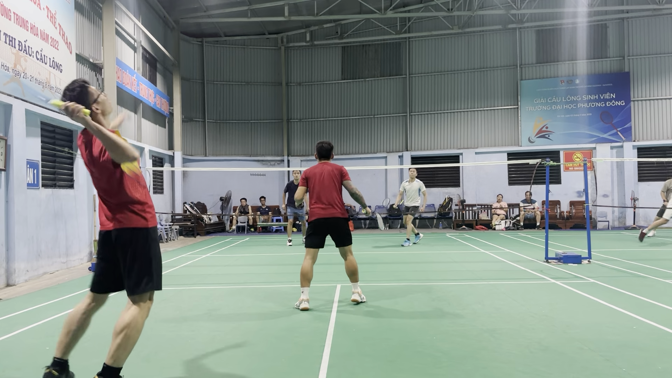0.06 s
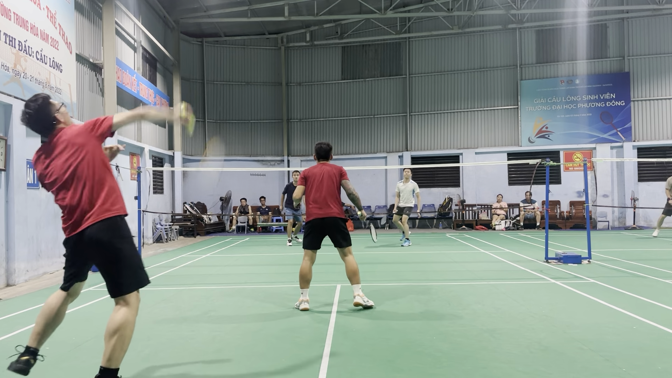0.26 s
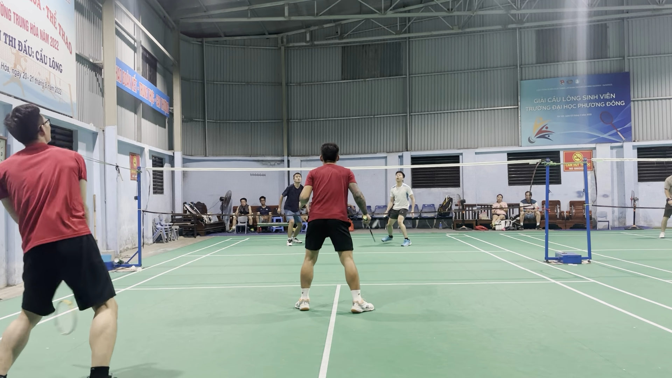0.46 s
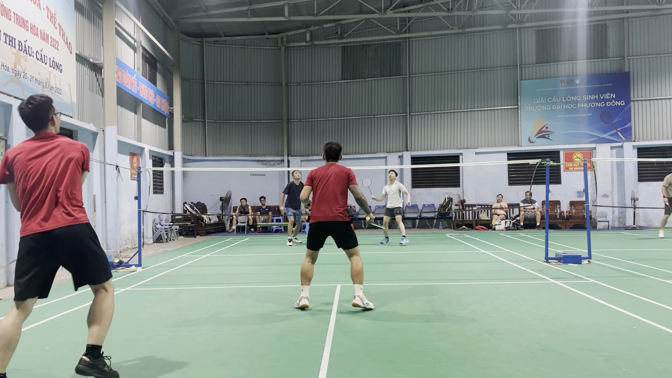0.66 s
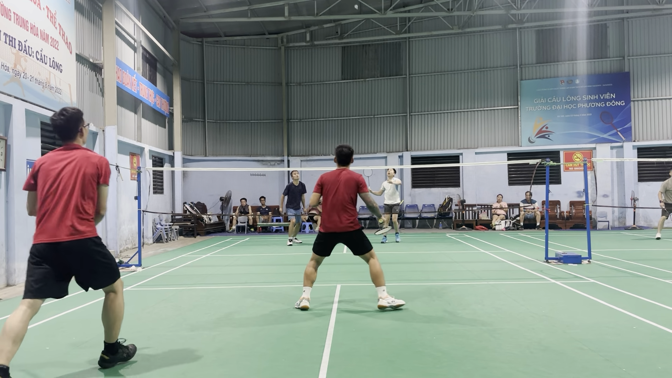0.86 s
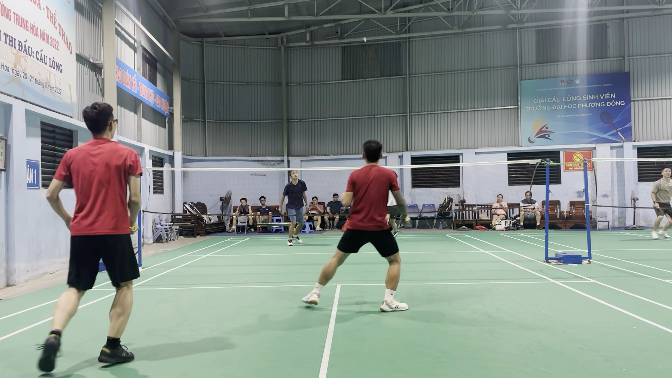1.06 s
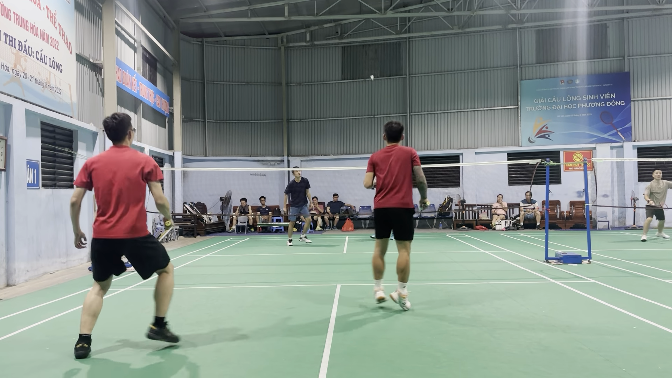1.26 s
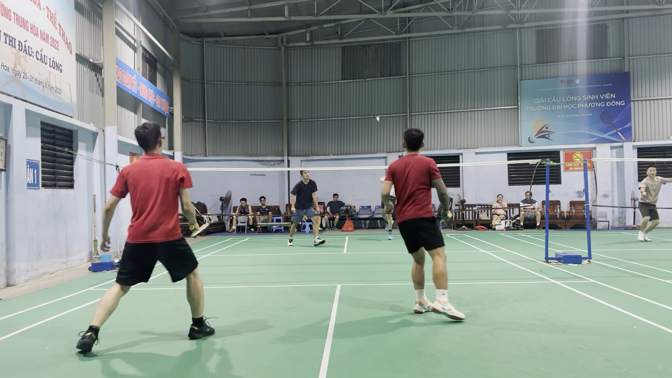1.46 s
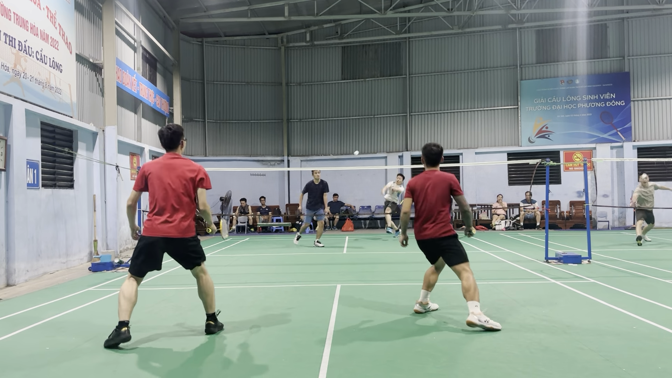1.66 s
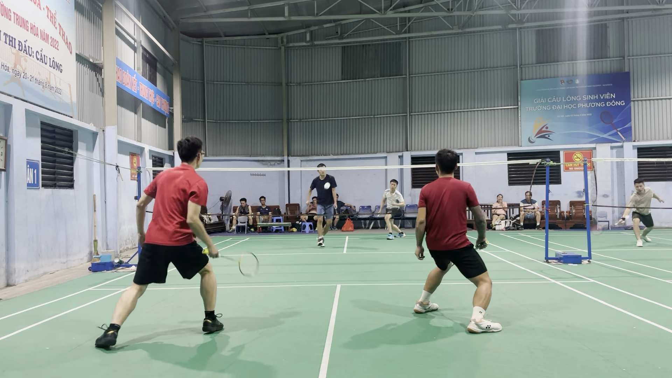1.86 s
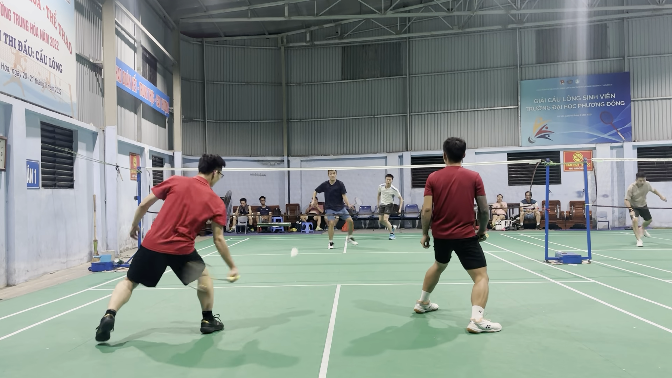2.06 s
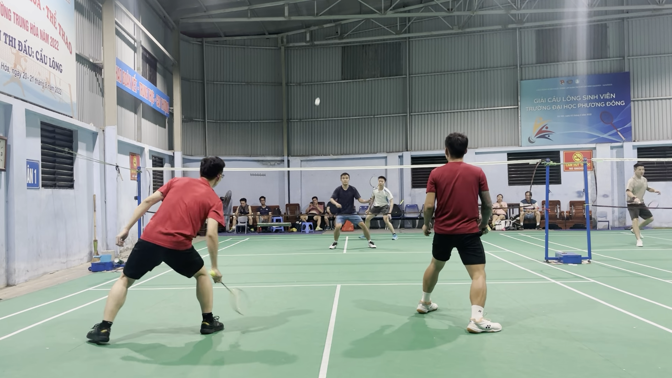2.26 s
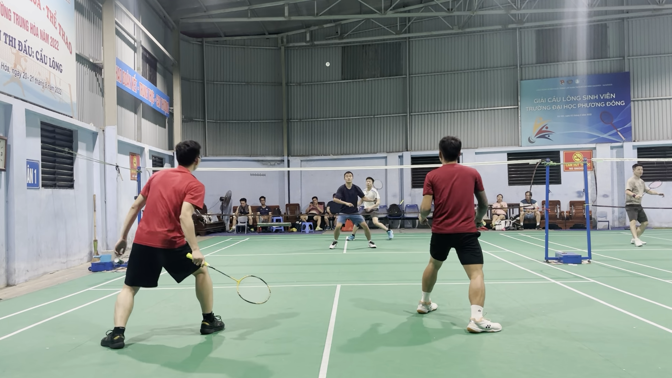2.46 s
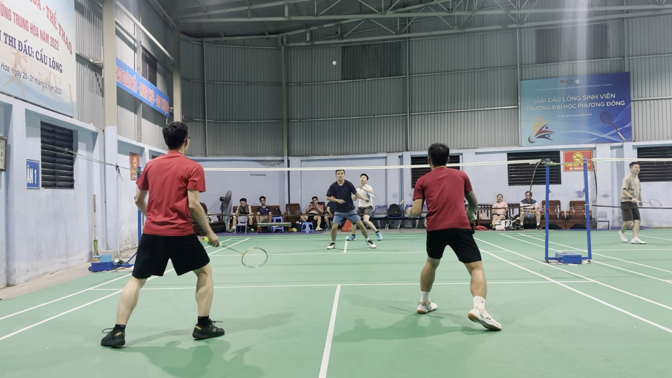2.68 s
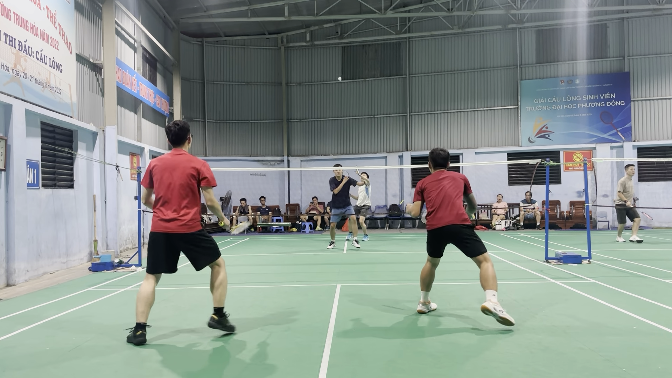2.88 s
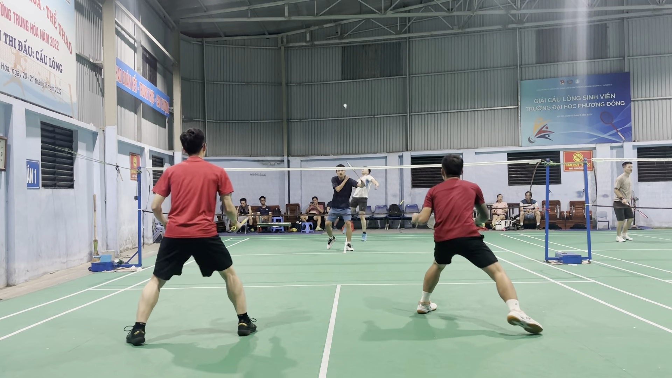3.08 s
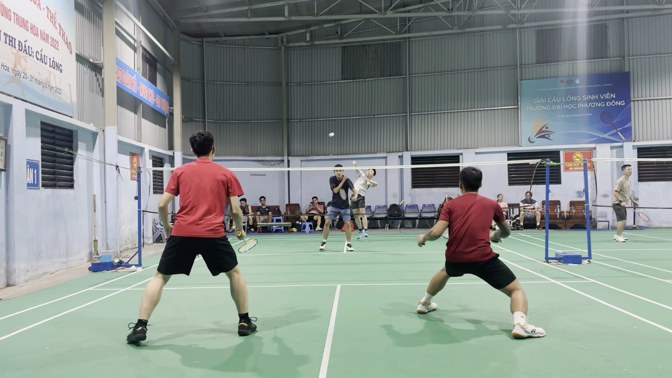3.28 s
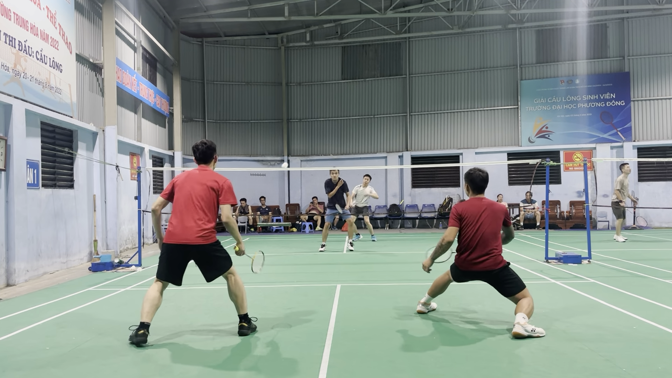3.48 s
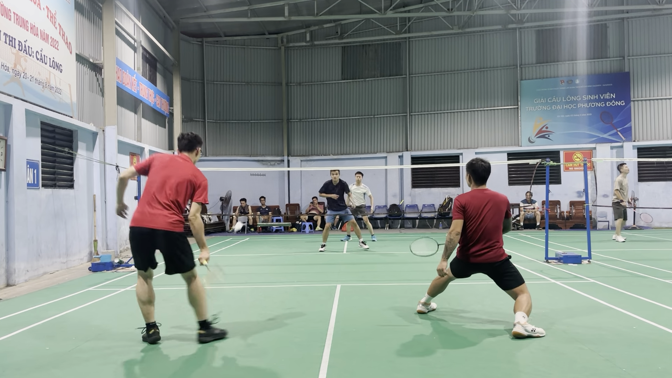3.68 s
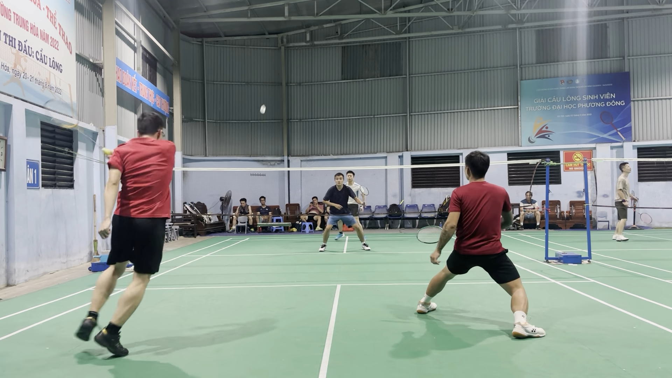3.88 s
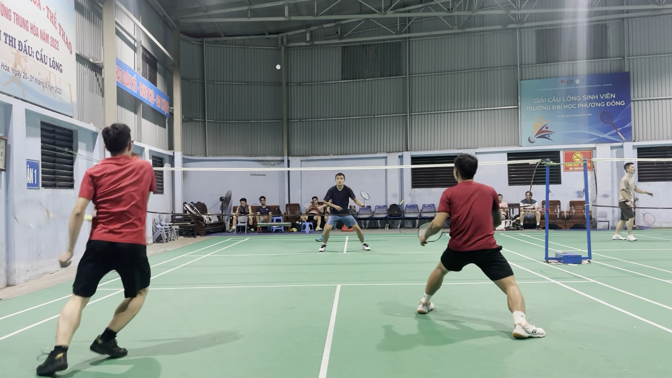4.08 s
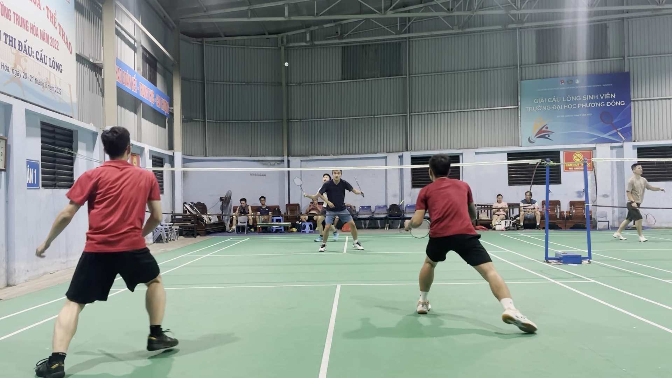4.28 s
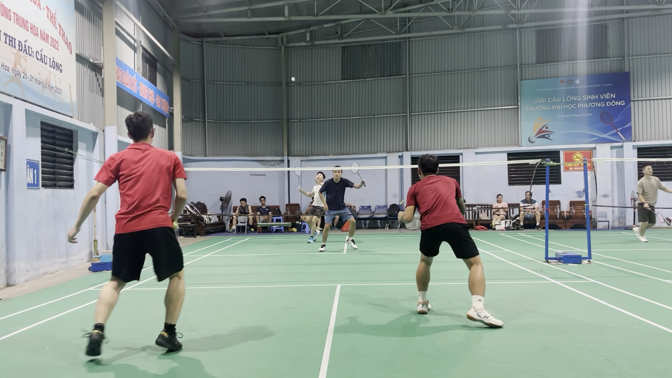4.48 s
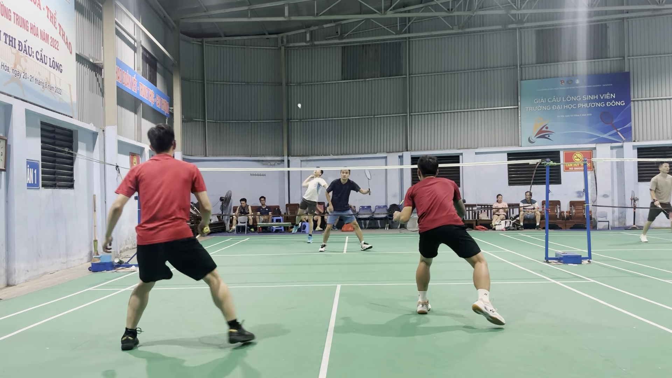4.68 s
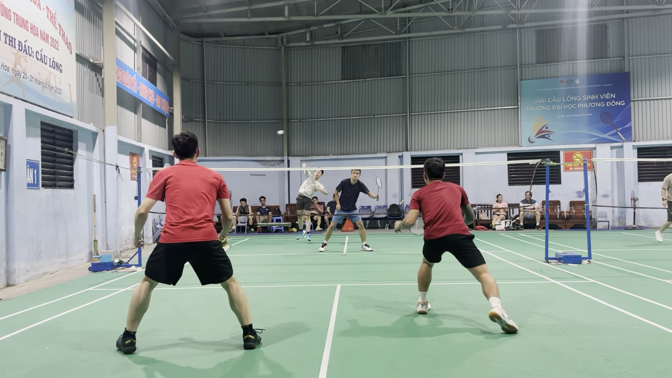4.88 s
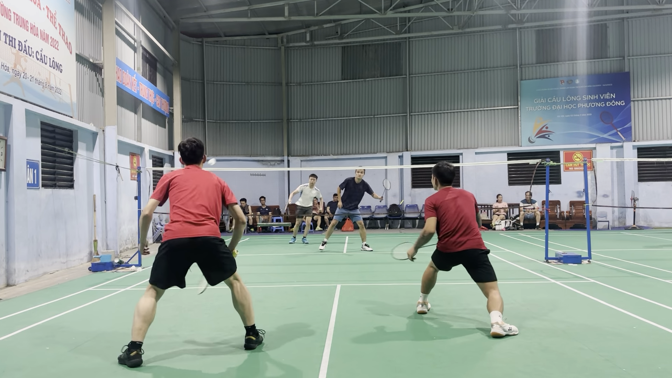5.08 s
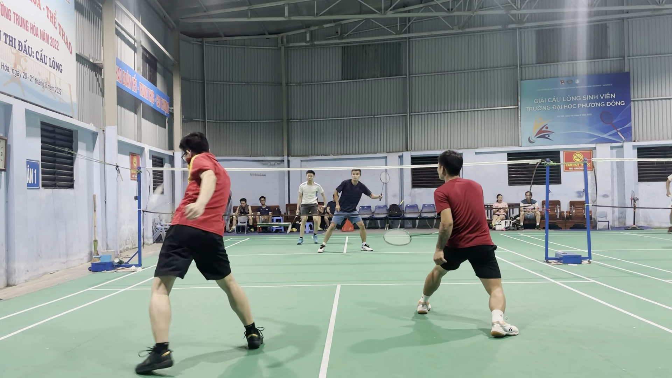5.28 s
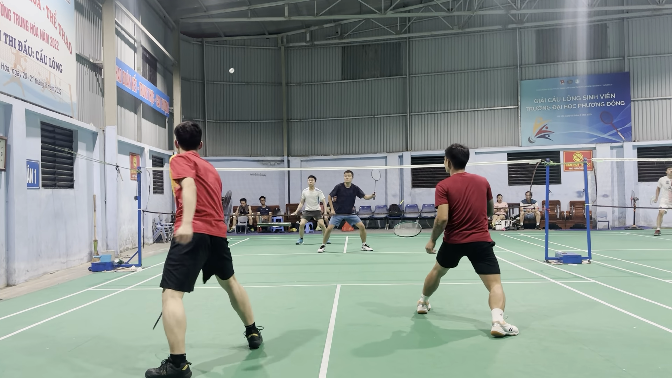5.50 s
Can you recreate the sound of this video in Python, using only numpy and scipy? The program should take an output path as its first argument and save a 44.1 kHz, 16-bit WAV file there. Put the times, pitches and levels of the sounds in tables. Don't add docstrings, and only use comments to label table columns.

```python
import sys
import numpy as np
from scipy import signal
from scipy.fft import rfft, irfft, next_fast_len
from scipy.io import wavfile
from scipy.ndimage import uniform_filter1d

SR = 44100
rng = np.random.default_rng(int(sys.argv[2]) if len(sys.argv) > 2 else 0)


def amplitude_ratio(level_db):
    exponent = np.asarray(level_db, float) / 20
    return 10 ** exponent


def wav_out(sig):
    wavfile.write(sys.argv[1], SR, np.round(np.clip(np.atleast_2d(sig).T, -1, 1) * 32767).astype(np.int16))


N = 244314
T = np.arange(N) / SR
SIZE = next_fast_len(N + 4096)
F = np.arange(SIZE // 2 + 1) * SR / SIZE + 1e-9


def unit(x):
    return x / np.sqrt(np.mean(x ** 2))


def along(table, hz, col=1):
    rows = np.array(table, float)
    return np.interp(np.log(hz), np.log(rows[:, 0]), rows[:, col])


def band(x, hz, width):
    return signal.lfilter(*signal.iirpeak(min(hz, .45 * SR), hz / width, SR), x)


def add(out, s, x):
    i = int(s * SR)
    out[..., i:i + x.shape[-1]] += x[..., :N - i]


def walk(rate):
    k = int(SR / rate)
    steps = np.repeat(rng.standard_normal(N // k + 1), k)
    return 0.34 * uniform_filter1d(uniform_filter1d(steps, k), k)[:N]


def split(colour, centres):
    white = rfft(rng.standard_normal((2, SIZE), dtype=np.float32))
    noise = white * amplitude_ratio(along(colour, F)).astype(np.float32)
    noise = noise / np.sqrt(np.mean(irfft(noise[0], SIZE) ** 2))
    place = np.interp(np.log(F), np.log(centres), np.arange(len(centres))).astype(np.float32)
    bands = []
    for k in range(len(centres)):
        share = np.sqrt(np.clip(1 - abs(place - k), 0, 1))
        bands.append(irfft(noise * share, SIZE)[:, :N])
    return bands


def fade(power, t60, rise_s):
    keep, grow = 10 ** (-6 / (t60 * SR)), np.exp(-1 / (rise_s * SR))
    return signal.lfilter([1 - grow], np.convolve([1, -keep], [1, -grow]), power)


def charge(feeds, hz):
    power = np.zeros(N)
    for s, length, *db in feeds:
        count = int(length * SR) + 1
        level = np.interp(np.log(hz), np.log([1000, 3500, 12000]), db)
        add(power, s, np.full(count, amplitude_ratio(2 * level) / count))
    return power


# (frequency [Hz], level [dB per Hz])
FAN_COLOUR = [(100, -20.5), (300, -0.5), (600, -5.5), (1200, -11), (2500, -20.5), (4500, -26), (6500, -29),
              (9000, -30), (13000, -70), (15000, -25), (16500, -70)]
# (frequency [Hz], level [dB per Hz])
STREET_COLOUR = [(20, -40), (32, -29), (45, -9), (65, -2), (100, 4), (150, 2.5), (250, -8), (400, -16),
                 (700, -21), (1200, -46)]
# (time [s], level [dB])
STREET_COURSE = [(0, -21), (.9, -24.5), (1.5, -24), (2.3, -24.5), (3, -29.5), (5.54, -28.5)]


def fans_and_street():
    out, swell = 0, walk(0.7)
    for noise in split(FAN_COLOUR, 200 * 2. ** np.arange(7)):
        out = out + noise * amplitude_ratio(-41.5 + 0.81 * swell + 3.1 * walk(6.83))
    street_db = np.interp(T, *np.transpose(STREET_COURSE)) - 7.5
    for noise in split(STREET_COLOUR, 40 * 2 ** np.arange(0, 4, .7)):
        out = out + noise * amplitude_ratio(street_db + 2.1 * walk(2.83))
    return out


def motorbike(rate, course, door, exhaust, scatter_db, jitter_s, smear_s):
    s, level = np.transpose(course)
    door_s, door_db, loss_db_per_s = door
    tick_db = door_db - loss_db_per_s * abs(T - door_s)
    arrive = np.clip((T - s[0] + .001) / .1 + (s[0] < .1), 0, 1)
    on = arrive * np.clip((s[-1] - T) / .1, 0, 1)
    cycles = np.cumsum(np.interp(T, *np.transpose(rate))) / SR
    fire = np.flatnonzero(np.diff(np.floor(cycles)))
    chance = rng.standard_normal((200, 3))[:len(fire)].T
    pulses, ticks = np.zeros((2, N))
    late = (jitter_s * SR * chance[0]).astype(int)
    pulses[np.clip(fire + late, 0, N - 1)] = amplitude_ratio(scatter_db * chance[1])
    ticks[fire] = amplitude_ratio(3.0 * chance[2])
    smear = rfft(rng.standard_normal(2048) * np.exp(-T[:2048] / smear_s), SIZE)
    boom = irfft(rfft(pulses, SIZE) * smear / abs(smear) * amplitude_ratio(along(exhaust, F)), SIZE)[:N]
    tick = band(band(ticks, 3800, 1100), 3800, 1100)
    return on * amplitude_ratio(np.interp(T, s, level)) * unit(boom), on * amplitude_ratio(tick_db) * unit(tick)


# (time [s], rate [Hz])
FAR_RATE = [(2.3, 23), (2.95, 24), (3.3, 23.9), (3.6, 23), (4.5, 22), (5, 22.9), (5.54, 22.9)]
# (time [s], level [dB])
FAR_COURSE = [
    (2.3, -31.5),
    (2.8, -37.5),
    (3.05, -31.5),
    (3.5, -35),
    (4, -33),
    (4.5, -47.5),
    (4.9, -36.5),
    (5.54, -39),
]
# (frequency [Hz], level [dB per Hz])
FAR_EXHAUST = [(30, -38), (48, 0.5), (70, -5.5), (95, -8), (120, -7), (143, -1), (190, -17.5), (250, -4.5),
               (330, -13.5), (500, -72)]


def far_motorbike():
    return motorbike(FAR_RATE, FAR_COURSE, (2.7, -68, 3), FAR_EXHAUST, 1.8, .0003, .018)


# (time [s], rate [Hz])
NEAR_RATE = [(0, 21.3), (.9, 21.75), (1.45, 20.55), (1.9, 20.55), (2.45, 20.2)]
# (time [s], level [dB])
NEAR_COURSE = [
    (0, -26),
    (.35, -29),
    (.5, -26),
    (1, -24),
    (1.15, -33),
    (1.5, -29.5),
    (1.951, -27.5),
    (2.15, -45),
    (2.45, -24),
]
# (frequency [Hz], level [dB per Hz])
NEAR_EXHAUST = [(25, -50), (42, -13), (65, -16), (85, -14), (105, 1.5), (128, -1), (152, 0), (185, -21),
                (240, -13), (330, -21), (500, -66.5)]


def near_motorbike():
    return motorbike(NEAR_RATE, NEAR_COURSE, (0.96, -52, 16), NEAR_EXHAUST, 1.6, .0003, .015)


# (frequency [Hz], level [dB per Hz])
HALL_COLOUR = [(120, -17), (250, -6), (500, -2.5), (900, -1), (1400, -2.5), (2200, -5.5), (3200, -11),
               (5000, -13), (7000, -19), (10000, -23), (13500, -28.5), (15500, -14), (16800, -60)]
# (frequency [Hz], T60 [s])
HALL_DECAY = [(200, 3), (1000, 3.15), (3000, 1.36), (6000, 1.85), (9000, 1.29), (15000, 0.87)]
# (frequency [Hz], T60 [s], level over the late sound [dB])
EARLY_DECAY = [(201, 0.42, 10), (2160, 0.12, 0), (12000, 0.3, 1)]
# (time [s], length [s], level [dB])
FAR_SLAPS = [
    (0.335, 0.01, -23),
    (0.441, 0.024, -26),
    (0.48, 0.086, -27.5),
    (4.918, .015, -19),
    (1.982, 0.0065, -33),
    (3.237, 0.017, -24),
    (3.323, 0.02, -25),
]
# level [dB] at (bass, middle, top)
HANGING_HIT = (-40.5, -41.5, -47)


def hall(feeds):
    centres = 180 * 2 ** np.arange(0, 7, .7)
    feeds = [(0.001, 0, *HANGING_HIT)] + feeds
    far = [(s, length, db, db - 9.5, db + 0.5) for s, length, db in FAR_SLAPS]
    out, lumps = 0, amplitude_ratio(1.1 * walk(46.15))
    for hz, noise in zip(centres, split(HALL_COLOUR, centres)):
        power = charge(feeds, hz)
        early_gain = lumps * amplitude_ratio(2 * along(EARLY_DECAY, hz, col=2))
        early = early_gain * fade(power, along(EARLY_DECAY, hz), 0.001)
        slaps = fade(charge(far, hz) + 1e-18, .15, .002)
        late = fade(power, along(HALL_DECAY, hz), 0.0098)
        out = out + noise * np.sqrt(early + slaps + late)
    return out


# (time [s], peak level [dB], length [s], hall share [dB])
SLIDES = [(0.908, -45.5, 0.0076, -14.5), (1.15, -50, 0.017, -15), (1.206, -39.5, 0.023, -23.5),
          (1.38, -42, 0.033, -21.5), (1.98, -46, 0.03, -11.5), (2.362, -51, 0.03, -55),
          (2.588, -52, 0.039, -11.5), (2.6694, -59.5, 0.03, -37), (2.835, -48, 0.028, -20),
          (3.003, -58, 0.026, -11), (3.136, -46, 0.042, -19), (3.639, -38.5, 0.12, -22.5),
          (3.706, -42, 0.079, -29), (4.071, -47, 0.018, -111), (4.293, -50, 0.026, -68),
          (4.627, -41, 0.02, -47), (4.827, -48, 0.074, -17), (5.243, -36, 0.021, -21.5)]


def scuffs():
    spread, feeds = np.zeros((2, N)), []
    t = T[:8192]
    treble = signal.butter(2, [4000, 15000], "bandpass", fs=SR, output="sos")
    for s, db, length, wet_db in SLIDES:
        chance = rng.standard_normal((2, 8192))
        grit = chance[0] * amplitude_ratio(5.0 * unit(uniform_filter1d(chance[1], size=60)))
        shape = np.minimum(t / 0.00088, 1) / (1 + (t / length) ** 4)
        hiss = signal.sosfilt(treble, grit)
        add(spread[0], s, amplitude_ratio(db - 6.0) * unit(hiss) * shape)
        wet = db + wet_db
        feeds.append((s, length, wet, wet + 16.5, wet + 18.0))
    return spread, feeds


# (time [s], length [s], start pitch [Hz], level [dB], hall share [dB])
SQUEALS = [(0.582, 0.069, 2930, -43.5, -1.5), (1.99, 0.079, 1200, -50, 8), (2.592, 0.057, 4500, -50.5, 0),
           (2.632, 0.019, 4560, -41, -19), (2.68, .06, 4510, -46, -9.5), (2.77, .055, 4520, -51, -4),
           (3.695, 0.016, 3220, -29.5, -18), (3.74, 0.029, 2620, -36.5, -22),
           (4.37, 0.23, 4650, -53.5, -10), (5.245, .012, 2940, -37, -21), (5.25, .012, 6470, -38, -22)]


def squeaks():
    direct, spread = np.zeros(N), np.zeros((2, N))
    t = T[:16384]
    for s, length, from_hz, db, wet_db in SQUEALS:
        to_hz = from_hz * (1 - 0.0073 - 0.035 * amplitude_ratio(2 * (db + 31)))
        chance = rng.standard_normal((4, 16384))
        gone = np.minimum(t / length, 1)
        waver = unit(uniform_filter1d(chance[:2], size=300))
        pitch = (from_hz + (to_hz - from_hz) * gone) * (1 + .008 * waver[0])
        turn = 2 * np.pi * np.cumsum(pitch) / SR
        shape = np.sin(np.pi * gone) ** .6 * amplitude_ratio(db + 2.5 * waver[1])
        add(direct, s, shape * (np.sin(turn) + amplitude_ratio(-9.5) * np.sin(2 * turn)))
        tail = np.sqrt(fade(shape ** 2 / (length * SR), 3.2, 0.007)) * np.cos(np.pi / 2 * t / t[-1])
        ring = unit(band(band(chance[2:], to_hz, 300), to_hz, 300))
        add(spread, s, amplitude_ratio(wet_db) * tail * ring)
    return direct, spread


def crack(thud_db, knock_db, feather_db, knock_hz, chance):
    t = np.arange(len(chance)) / SR
    rattle = chance * np.exp(-.5 * ((t - .0009) / 0.0007) ** 2)
    turns = 900 * (t + 0.00033 * (1 - np.exp(-t / 0.00028)))
    thud = np.sin(2 * np.pi * turns) * (t / .0008) ** 2 * np.exp(-t / 0.0005)
    tap = np.exp(-.5 * ((t - .001) / .00004) ** 2) + 0.049 * rattle
    knock = band(tap, knock_hz, 630) - amplitude_ratio(-6.5) * band(tap, 2.01 * knock_hz, 960)
    feathers = band(band(rattle, 8200, 15000), 8000, 16000)
    parts = (thud, 1.5), (knock, knock_db + 12.0), (feathers, feather_db + 9.5)
    return sum(amplitude_ratio(thud_db + db) * part / abs(part).max() for part, db in parts)


# (time [s], string thud peak [dB], cork knock re thud [dB], hall share [dB], knock pitch [Hz])
STROKES = [
    (0.238, -9.5, -8.5, -17.5, 1630),
    (1.618, -10.5, -8, -18, 2070),
    (2.146, -21, -7.5, -18.5, 2000),
    (3.171, -25.5, 1.5, -9.5, 2450),
    (3.28, -10.5, -9.5, -16.5, 2010),
    (3.7898, -27, 4.5, -16.5, 1790),
    (4.3415, -32, -6.5, -13, 3870),
    (4.8804, -6, -10, -20.5, 1900),
    (5.296, -22, -13.5, -15.5, 1840),
]
# (time [s], thud peak [dB], feather crack re thud [dB])
FIRST_RETURNS = [(0.2426, -14, -29), (0.2503, -12, -15), (1.6276, -17.5, -23), (1.637, -29, -13),
                 (1.983, -39, -6), (3.2875, -17, -3), (3.2995, -24, -14), (3.801, -35, 7),
                 (4.8843, -14.5, -33), (4.8866, -10.5, -3), (4.8905, -22, -20), (4.8995, -9.5, -20)]
# (frequency [Hz], width [Hz], level re thud [dB])
RACKET_MODES = [(910, 39, -42), (1010, 310, -16.5), (1124, 18, -11.5), (1900, 130, -13.5), (2420, 170, -39)]


def rackets():
    direct, spread, feeds, ring = np.zeros(N), np.zeros((2, N)), [], np.zeros(N)
    for s, db, knock, wet_db, hz in STROKES:
        feather = -6 + 7.5 * np.log2(hz / 1900) + 0.3 * (knock + 10)
        dry_blow = crack(db, knock, feather, hz, rng.standard_normal(2048))
        blow = dry_blow
        for mode_hz, width, mode_db in RACKET_MODES:
            mode = band(dry_blow, mode_hz, width)
            blow = blow + amplitude_ratio(db + mode_db) * mode / abs(mode).max()
        add(direct, s + .0001, blow)
        when, size = rng.random((2, 2, 24))
        walls = np.zeros((2, 8192))
        lag = (.013 + .14 * when ** 1.5) * SR
        bounce = (2 * size - 1) * amplitude_ratio(-11) * np.exp(-when / .6)
        np.put_along_axis(walls, lag.astype(int), bounce, axis=1)
        add(spread, s, signal.fftconvolve(walls, blow[None], axes=1))
        wet = db + wet_db
        feeds.append((s + 0.00055, .001, wet, wet + 0.52 * (knock + 6), wet + 0.95 * (feather + 8)))
        add(ring, s, amplitude_ratio(2 * np.array([wet])))
    for s, db, feather in FIRST_RETURNS:
        _, _, knock, _, hz = [hit for hit in STROKES if hit[0] < s][-1]
        add(direct, s - .0006, crack(db, knock, feather, hz, rng.standard_normal(512)))
    tone = unit(band(band(rng.standard_normal((2, N)), 1180, 41), 1180, 41))
    return direct, spread + amplitude_ratio(-5.5) * tone * np.sqrt(fade(ring, 1.5, .02)), feeds


# (frequency [Hz], likeness [0-1], left minus right [dB])
PAIR = [(60, 1, 2), (208, 0.68, 2), (500, 0.09, 1), (955, 0.08, 1), (1900, 0, 0), (2480, 0.37, -1),
        (4000, 0.3, -2.5), (5800, 0.4, -10.5), (6660, 0.4, -2), (7700, 1, 3)]
# (frequency [Hz], right's lead [turns])
DIFFUSE_LEAD = [(200, 0), (1100, -.5), (2300, -.8), (4000, -.87), (8500, -.5), (11600, -.08), (14200, .08),
                (15300, .5)]
# (frequency [Hz], right's lead [turns])
FRONT_LEAD = [(0, 0), (2500, .06), (4800, .06), (6600, -.77), (17100, .65)]
# (frequency [Hz], level [dB])
MIC_TOP = [(15600, 0), (16350, -8), (16550, -60)]
# (frequency [Hz], level [dB])
AIR_LOSS = [(14700, 0), (15300, -9), (16200, -20)]


def microphones(direct, spread, aside):
    like = np.clip(along(PAIR, F), 0, 1)
    tilt = amplitude_ratio(along(PAIR, F, col=2) / 2)
    a, b = rfft(spread, SIZE) * amplitude_ratio(along(AIR_LOSS, F))
    same, other = np.sqrt((1 + like) / 2) * a, np.sqrt((1 - like) / 2) * b
    turns = along(DIFFUSE_LEAD, F)
    lead = np.exp(1j * np.pi * (turns - np.sin(4 * np.pi * turns) / (4 * np.pi)))
    front = np.exp(1j * np.pi * np.interp(F, *np.transpose(FRONT_LEAD)))
    ahead, beside = rfft(direct, SIZE), rfft(aside, SIZE)
    left = (same + other) * tilt / lead + ahead * amplitude_ratio(-2.0) / front - beside * amplitude_ratio(-27)
    right = (same - other) * lead / tilt + ahead * amplitude_ratio(-3.5) * front + beside
    return irfft(np.array([left, right]) * amplitude_ratio(along(MIC_TOP, F)), SIZE)[:, :N]


def scene():
    hits, walls, hit_feeds = rackets()
    slides, slide_feeds = scuffs()
    squeals, squeal_tails = squeaks()
    near, near_ticks = near_motorbike()
    far, far_ticks = far_motorbike()
    bikes = (near + amplitude_ratio(-1.5) * far) * np.array([[1], [.15]])
    ringing = hall(hit_feeds + slide_feeds)
    around = walls + slides + squeal_tails + ringing + fans_and_street() + bikes
    return microphones(hits + squeals, around, near_ticks + far_ticks)


def low_pass(x):
    return signal.sosfilt(signal.butter(12, 16510, fs=SR, output="sos"), x)


def record(dry):
    mix = np.tanh(0.69 * dry) / 0.71
    return low_pass(mix)


dry = scene()
out = record(dry)
wav_out(out)
```